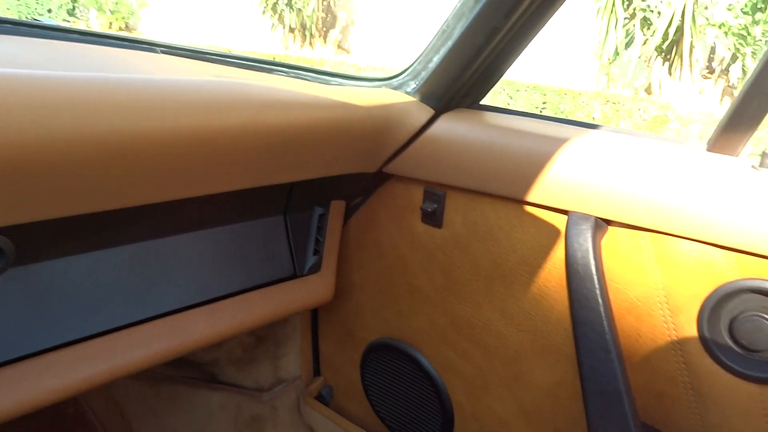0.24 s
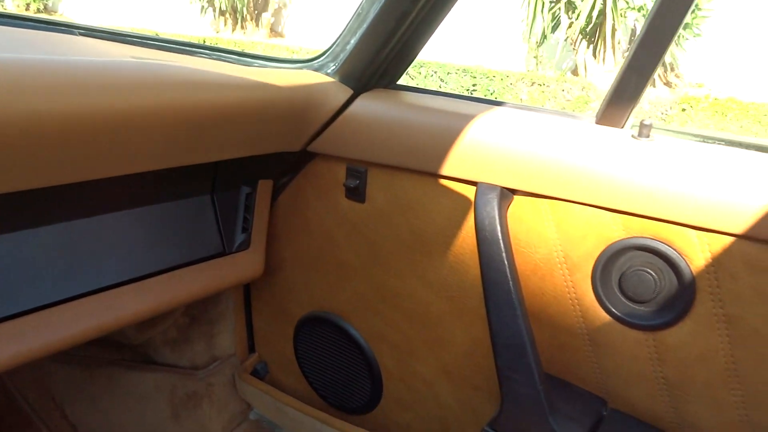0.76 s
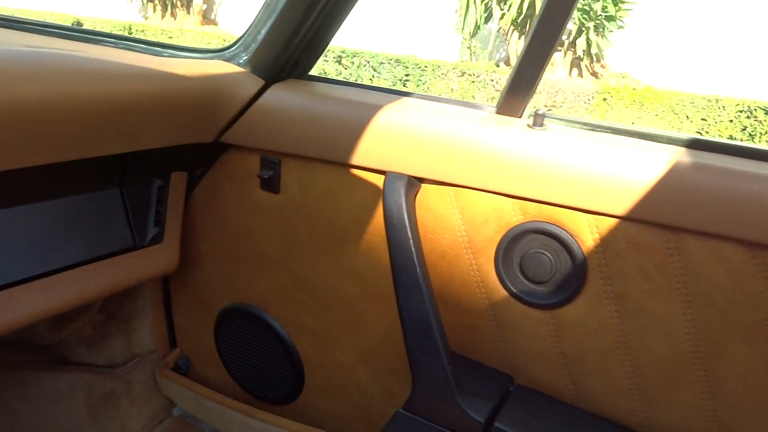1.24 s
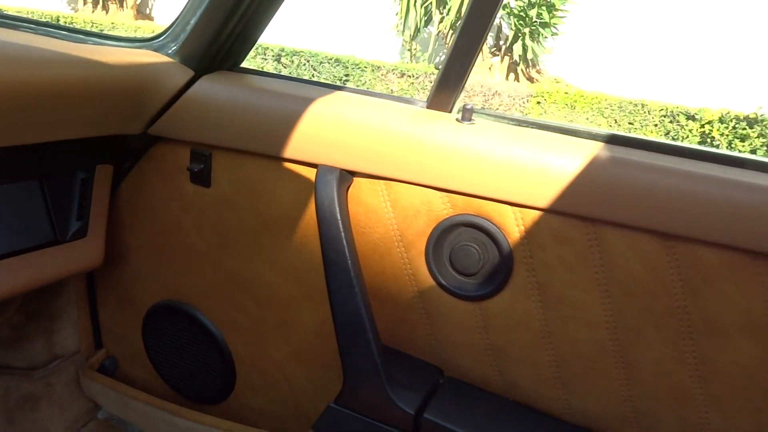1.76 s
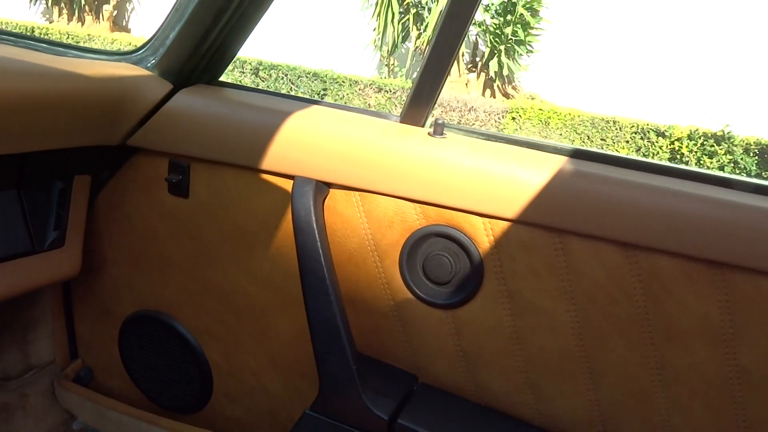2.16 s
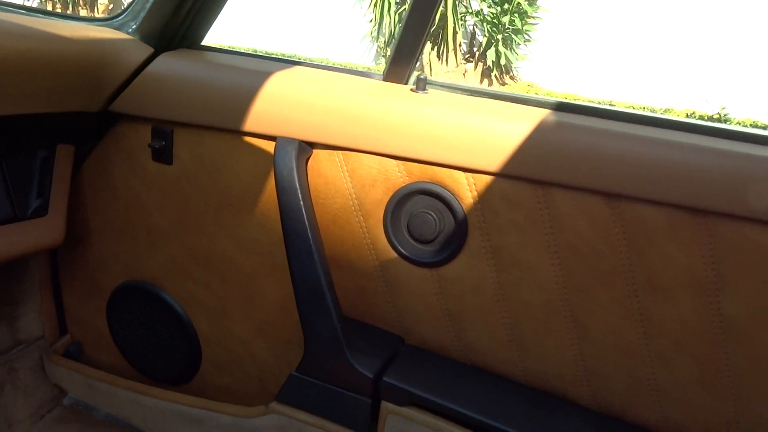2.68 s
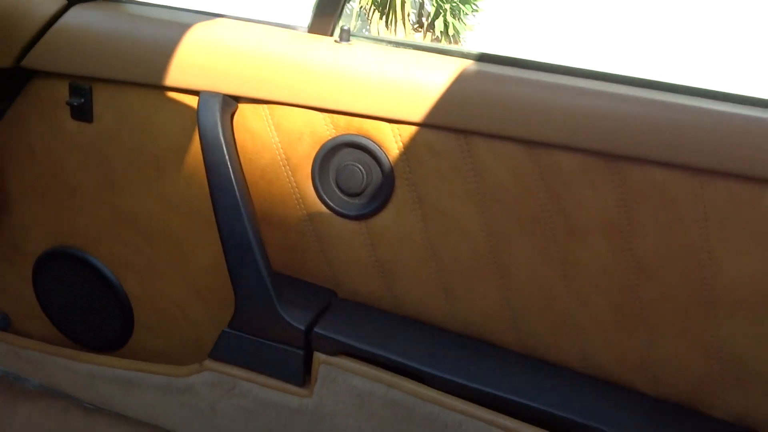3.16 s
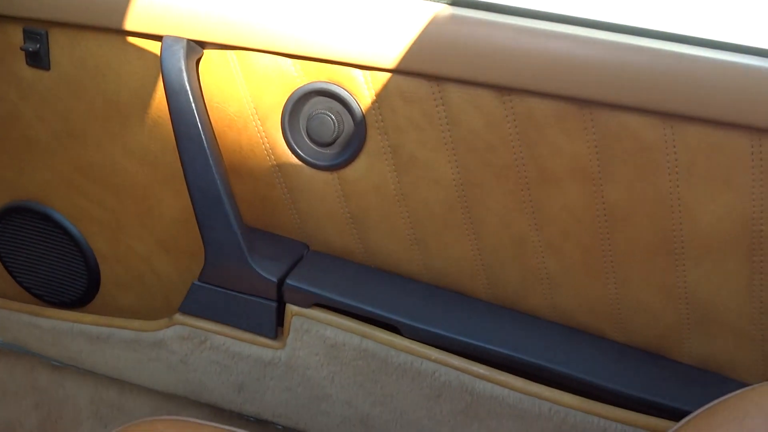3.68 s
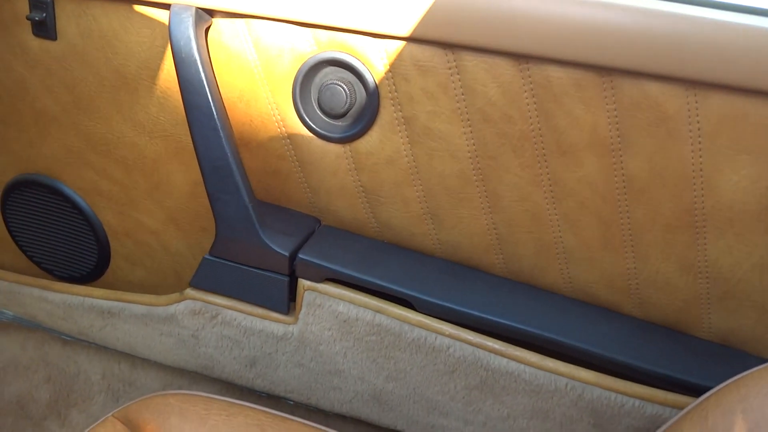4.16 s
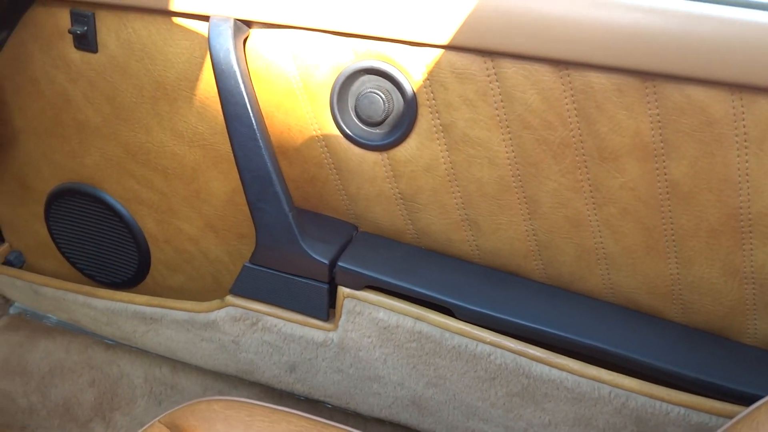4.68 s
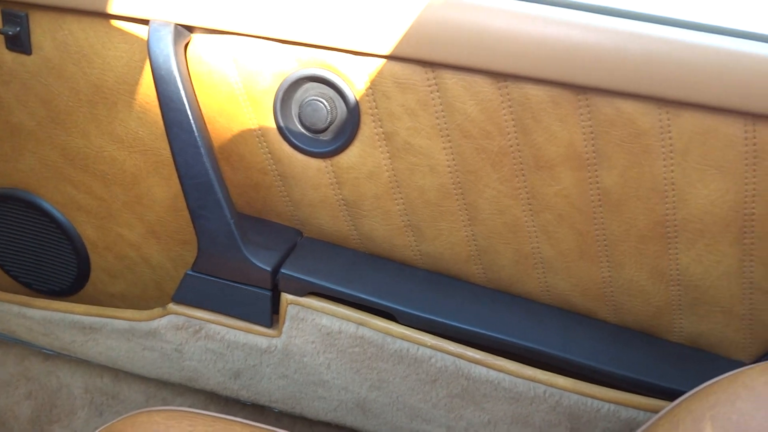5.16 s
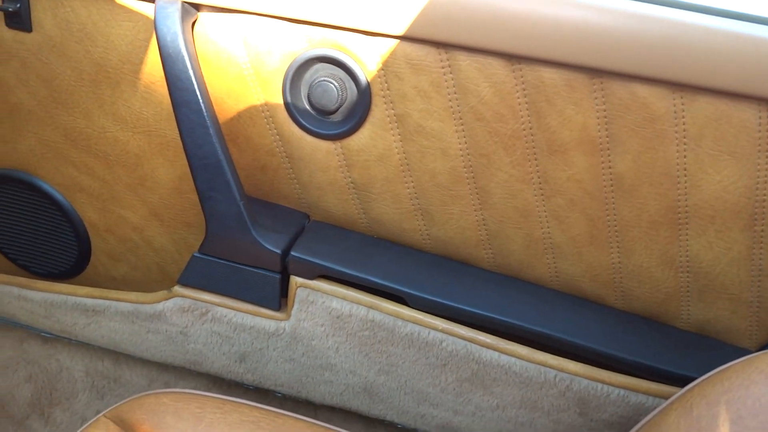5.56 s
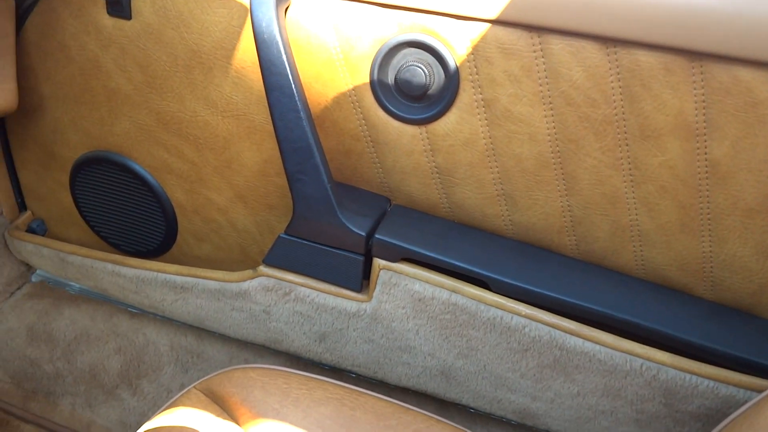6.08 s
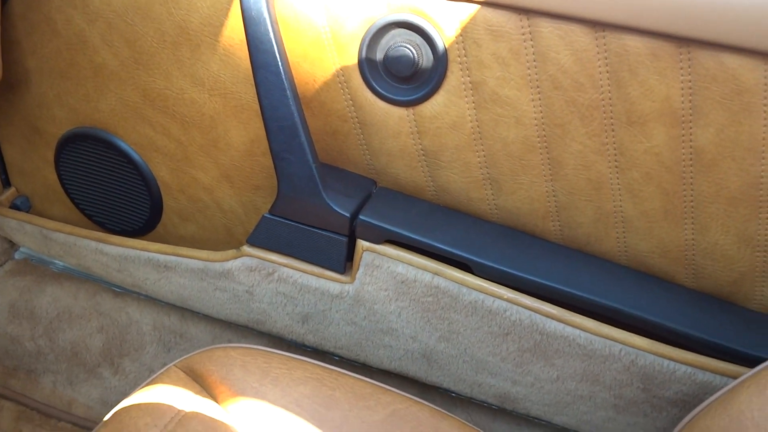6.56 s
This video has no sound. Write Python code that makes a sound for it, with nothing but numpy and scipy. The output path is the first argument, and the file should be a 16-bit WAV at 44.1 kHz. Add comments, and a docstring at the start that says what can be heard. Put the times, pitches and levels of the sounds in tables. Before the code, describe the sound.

A bunch of keys clinks and jingles close by in a quiet parked car, sparse dull clicks growing into bright, dense bursts over faint hum.

```python
"""A bunch of keys is turned over in a hand inside a parked car.
A faint low hum, outdoor air and the hiss of fingers (shaped noise) lie beneath everything from the start.
First come single dull clicks (damped noise clouds with one note), a little seat rustle and a few soft bumps.
Then the jingles grow brighter and denser: plastic heads knock, a heavier key chimes, and keys that
swing free ring on briefly as decaying sines, while the upholstered cabin keeps other contacts short."""
import sys
import numpy as np
from scipy.fft import rfft, irfft, next_fast_len
from scipy.io import wavfile
from scipy.ndimage import map_coordinates

SR = 44100
rng = np.random.default_rng(int(sys.argv[2]) if len(sys.argv) > 2 else 0)


def digitize_waveform(pressure):
    """Quantize a signal to 16-bit integers and store it at the path in sys.argv[1].

    Rows of a 2-D input are taken as channels; values are limited to [-1, 1].
    """
    field = np.atleast_2d(pressure).T
    bounded = np.clip(field, -1, 1)
    quanta = np.round(bounded * 32767).astype(np.int16)
    wavfile.write(sys.argv[1], SR, quanta)


N = 301203

# low hum, level over time: time_s, level_db
HUM_LEVEL = [(0, -57.5), (6.8, -61.5)]
# colour of the hum: freq_hz, density_db (per Hz, relative)
HUM_COLOUR = [(11, -39), (18, 2.5), (49, 3.5), (65, 6), (91, -8), (151, 2.5), (215, -14), (240, -23),
              (310, -60), (530, -120)]
# steady tones in the hum: freq_hz, level_db (against the hum, before wavering)
HUM_TONES = [(33, -14.5), (56, -9), (157, -15)]
# outdoor air, level over time: time_s, level_db (before trim and wavering)
AIR_LEVEL = [(0.0, -51.5), (0.25, -53), (1.45, -51.5), (1.75, -50.5), (2.72, -53.5), (3.06, -50.5),
             (3.33, -55.5), (3.96, -53.5), (4.24, -57.5), (5.73, -55.5), (6.28, -56.5), (6.83, -54.5)]
# colour of the air: freq_hz, density_db (per Hz, relative)
AIR_COLOUR = [(180, -9), (320, -1.5), (430, -1.5), (680, -4.5), (830, 2), (1150, 3), (1600, -3),
              (2100, -7.5), (3000, -13.5), (4500, -16), (8000, -42)]
# hiss of the hand between the slides: time_s, level_db
GRIP_LEVEL = [(0, -54.5), (2.8, -54), (4.2, -59.5), (5.3, -51), (6.45, -63), (6.83, -60)]
# fingers slide over the keys: start_s, length_s, level_db
RUBS = [(0, 0.24, -50.5), (.42, 0.64, -55), (1.208, 0.11, -51), (1.57, 0.2, -48), (1.82, 0.38, -56.5),
        (2.46, 0.51, -59.5), (2.878, 0.2, -49), (3.436, 0.26, -50.5), (3.87, 0.3, -57), (4.266, 0.056, -57),
        (4.452, 0.3, -58.5), (4.925, 0.27, -53), (5.45, 0.11, -51.5), (5.604, 0.26, -52.5),
        (5.918, 0.11, -48), (6.11, 0.2, -54), (6.581, 0.21, -52)]
# colour of skin hiss: freq_hz, density_db (per Hz, relative)
SKIN_COLOUR = [(1500, -12), (3000, -5), (4300, -2), (5400, 0.5), (6200, 3.5), (7000, -3.5), (8000, -12.5),
               (10000, -9), (15000, -62)]
# colour of metal sliding on metal: freq_hz, density_db (per Hz, relative)
METAL_SLIDE_COLOUR = [(6000, -21), (8000, -18.5), (10000, 1), (11300, -5), (12500, -9), (14500, -8.5),
                      (15800, -20)]
# key against key: start_s, click_db (near 5 kHz, relative), knock_db (near 1.7 kHz, over the click),
# sparkle_db (near 11 kHz, over the click), note_hz
CONTACTS = [(0.026, -39, -9, -2, 5720), (0.041, -35.5, -12, -4.5, 5950), (0.199, -45, 1.5, -8.5, 1320),
            (0.993, -48, 7, -17, 3040), (1.053, -40.5, 0, -22, 2310), (1.308, -42, -6.5, -22, 6080),
            (1.412, -43, -7, -7, 6040), (1.474, -28, -7.5, -13, 5820), (1.586, -32, 1.5, -13.5, 2950),
            (1.756, -33.5, -8, -8, 6000), (1.953, -36, -30, -4, 6100), (1.974, -40, 1, -7, 5680),
            (2.069, -45, -16, -5, 6120), (2.11, -37.5, -9, -4, 6470), (2.121, -37.5, -10, -2.5, 6370),
            (2.277, -37, -3, -4.5, 6870), (2.415, -28.5, -15.5, -2, 3590), (2.509, -39, -6, -14, 6300),
            (2.528, -45, 1.5, -1, 5640), (2.55, -29, -23, -9.5, 6960), (2.595, -33, -9.5, 3.5, 10600),
            (2.692, -42.5, -15, -3.5, 5300), (2.775, -44, -19, -8, 6400), (2.881, -52, 9, -4.5, 2590),
            (3.009, -43.5, -3, -4, 3300), (3.123, -46, -2.5, -10, 3450), (3.192, -47, 0.5, -15.5, 2520),
            (3.34, -40, -6, -17.5, 5300), (3.374, -38.5, -5, -4, 6000), (3.385, -28, -5.5, -2.5, 6160),
            (3.447, -38.5, -4.5, -1.5, 5950), (3.587, -40, -1.5, 0, 5590), (3.614, -39, -0.5, 2, 6100),
            (3.637, -30.5, -5.5, 2, 6180), (3.721, -40.5, -4.5, -5, 5630), (3.738, -41.5, -6.5, -4, 5590),
            (3.803, -31.5, -22, 1.5, 10980), (3.869, -31.5, -18, 1.5, 5620), (3.883, -33.5, -7.5, -6, 5870),
            (3.912, -40, -3, -7, 6400), (3.967, -41.5, -11, -17, 6400), (4.055, -37.5, -3.5, -5.5, 1580),
            (4.095, -48, 2, 2, 12240), (4.128, -43, -0.5, -3, 5140), (4.43, -45, -12, 2, 6080),
            (4.492, -49, 0.5, 4, 5900), (4.547, -42.5, -24, 4, 12480), (4.577, -41.5, -37, 7, 12200),
            (4.598, -42, -25, 6, 8160), (4.613, -35, -15, 3.5, 12330), (4.653, -37, -10, -7.5, 5140),
            (4.681, -38, -12, -2, 5720), (4.921, -44, -6, 7, 6080), (4.94, -38.5, -13, 8.5, 13900),
            (4.98, -41, -16, 6, 5460), (5.001, -34, -13.5, 3, 9700), (5.022, -43, -4, 4, 6130),
            (5.053, -32, -10, -2.5, 6130), (5.171, -40.5, -19, -5, 6200), (5.349, -33.5, -6.5, -6.5, 6180),
            (5.421, -42, -12, 0, 6090), (5.464, -34.5, -12.5, -2, 5630), (5.492, -33.5, 0, -12, 5700),
            (5.508, -37.5, -1.5, -4, 5730), (5.528, -39, -4, 7, 6100), (5.544, -36.5, -8, -11, 3540),
            (5.605, -33.5, -13.5, -1.5, 14100), (5.621, -34, -11, -0.5, 14120),
            (5.649, -26, -20, 1.5, 6000), (5.705, -34, -11, 7, 14050), (5.844, -45, -10.5, -1.5, 5470),
            (6.06, -43, -6.5, 3.5, 11800), (6.086, -36, -20, 6, 13870), (6.127, -45.5, -10, 6.5, 14170),
            (6.178, -26.5, -10, 2, 8580), (6.196, -25, -12.5, 1, 8170), (6.261, -46, -2.5, 9.5, 14280),
            (6.321, -32, -15, 4.5, 6180), (6.469, -23.5, -6.5, -7.5, 6140), (6.551, -41, -15, 1, 5930),
            (6.62, -40, -7, 0, 6070), (6.641, -29.5, -18, 0, 5540), (6.673, -27.5, -17.5, -2.5, 5650),
            (6.716, -39, -16, 1, 6030), (6.824, -36.5, -12, 6.5, 9940)]
# colour of a contact: freq_hz, density_db (per Hz, relative)
CLINK_COLOUR = [(450, -25), (850, -18), (1350, -4.5), (2100, -3.5), (3400, 1.5), (4500, -2), (5900, 9),
                (7500, 2.5), (8500, 4), (10000, 17), (11200, 7.5), (12400, 13.5), (14200, 8), (15600, -4)]
# the bunch shifts and small touches tumble: start_s, length_s, click_db (before scatter),
# sparkle_db (over the click)
FLURRIES = [(.03, .03, -45.5, -3), (3.595, .05, -35, -10), (3.74, .04, -42.5, 0), (3.89, .09, -55, 2),
            (4.06, .08, -49, -2), (4.438, .04, -45.5, 0), (4.56, .09, -42.5, 2), (4.93, .13, -39, -2),
            (5.43, .12, -51.5, -3), (5.61, .11, -43.5, 3), (6.07, .11, -53, 0), (6.324, .04, -46, -12),
            (6.55, .13, -47, -6)]
# range of the notes of small touches: low_hz, high_hz
TOUCH_NOTE_HZ = (5550, 6500)
# clothes shift on the seat: centre_s, half_length_s, level_db (before grain), centre_hz
RUSTLES = [(0.637, 0.19, -55, 292), (.64, 0.12, -65, 116), (1.207, 0.2, -61, 440), (1.795, 0.27, -56, 805),
           (3.02, .11, -51.5, 560), (3.006, 0.12, -51.5, 2420), (5.043, 0.076, -56.5, 360),
           (5.366, 0.018, -51.5, 323), (5.498, 0.13, -56.5, 585)]
# soft bumps on the trim: start_s, level_db, pitch_hz, t60_s
BUMPS = [(0.558, -44, 318, .12), (0.577, -48, 157, 0.17), (0.668, -45, 306, 0.076),
         (0.676, -43.5, 180, 0.08), (2.28, -51.5, 167, 0.13), (4.941, -48, 114, 0.09),
         (5.351, -46, 302, 0.16), (5.354, -46, 545, .07), (5.375, -48, 140.5, 0.27)]
# a key's plastic head knocks: start_s, level_db
HEAD_KNOCKS = [(1.586, -39), (4.054, -42), (6.4662, -30.5)]
# what the head rings with: pitch_hz, level_db (relative), t60_s
HEAD_MODES = [(1366, -7, 0.028), (1564, -2, 0.049), (1867, -3, 0.053)]
# strikes of a heavier key on the ring: start_s, level_db
HEAVY_STRIKES = [(3.738, -40), (3.804, -32), (3.866, -28.5), (5.649, -32), (6.64, -23), (6.676, -28)]
# what the heavier key rings with: pitch_hz, level_db (relative), t60_s
HEAVY_MODES = [(5630, -1, .08), (5820, 0, .07), (5930, -3, .07), (12470, -9, .05)]
# a key swings free and rings: start_s, fifth_mode_db, last_mode_db (ends of a tilt over KEY_MODES)
FREE_RINGS = [(3.8063, -50, -54), (3.8678, -50, -37), (4.5767, -35, -38), (4.9452, -35, -25),
              (5.0415, -29.5, -36), (5.6224, -36, -37), (5.688, -36, -29), (5.7028, -48, -23),
              (5.711, -56, -28), (6.099, -53, -32), (6.1554, -49, -33), (6.1758, -46, -29),
              (6.212, -35, -34), (6.3231, -29.5, -31), (6.3388, -34, -29), (6.3564, -41, -37),
              (6.4736, -41, -29), (6.6732, -38, -30)]
# what free keys ring with: pitch_hz (before bending), level_db (relative, before scatter), t60_s
KEY_MODES = [(2929, -16, .07), (3386, -14, .07), (5566, -10, .07), (5985, -7, .08), (6135, 1, .16),
             (6250, -7, .13), (6944, -14, .07), (8038, -7, .09), (8190, -5, .11), (8530, -10, .07),
             (9670, -12, .08), (9850, -8, .1), (10400, -12, .07), (11880, -4, .11), (12010, -9, .08),
             (12430, -9, .07), (13830, -5, .08), (14045, 1, .085), (14170, -6, .08), (14330, -8, .08)]
# side level set for the background, against the middle: freq_hz, side_over_mid_db
BACKGROUND_SIDE = [(30, -48), (100, -26.5), (250, -12), (700, -11.5), (1300, -12), (2500, -17),
                   (4000, -27.5), (6000, -31), (8500, -4), (12500, -32)]
# keys heard off glass and trim: freq_hz, side_db (against the direct sound)
REFLECTED = [(1000, -30), (3500, -53), (6000, -19), (8500, -7), (12000, -24)]
# level difference between the ports: freq_hz, left_minus_right_db
PORT_LEAN = [(200, 0), (800, -.6), (2200, 0), (5000, 0), (6300, -.7), (7000, -3.5), (8000, -4.3),
             (8250, -7.5), (8680, -12), (9000, -5.5), (9500, -2.3), (10700, -.7), (12000, 0)]
# phase difference between the ports: freq_hz, left_lead_rad
PORT_LEAD = [(4800, 0), (6100, -.26), (8100, -.43), (8750, -.2), (8950, .22), (9800, .26), (11300, 0)]

RUB_ATTACK_S, RUB_RELEASE_S = 0.025, 0.026
METAL_SLIDE_DB = -9.5  # against the hiss of skin
CLINK_ATTACK_S = 0.0018
REBOUND_S, REBOUND_DB = 0.007, -13  # mean delay and level of a second, weaker blow
TOUCHES_PER_S, TOUCH_SCATTER_DB = 90, 2.5
TOP_HZ = 15850


def amp(db):
    """Decibels to gain."""
    return 10 ** (np.asarray(db) / 20)


def unit(x):
    """Bring x to rms 1."""
    return x / np.sqrt(np.mean(x ** 2) + 1e-20)


def along(points, hz):
    """Read (Hz, value) points on a log frequency axis."""
    f, v = np.transpose(points)
    return np.interp(np.log(hz + 1), np.log(f + 1), v)


def level_curve(points):
    """Draw (s, dB) points out to one value per sample."""
    s, db = np.transpose(points)
    return np.interp(np.arange(N) / SR, s, db)


def wobble(rate):
    """A random curve: straight lines between rate knots a second."""
    knots = rng.standard_normal(int(N * rate / SR) + 4)
    return map_coordinates(knots, [np.arange(N) * rate / SR], order=1)


def filtered(x, response):
    """Shape the spectrum of x by a function of frequency."""
    m = next_fast_len(N + SR // 4)
    return irfft(rfft(x, m) * response(np.fft.rfftfreq(m, 1 / SR)), m)[..., :N]


def noise(spectrum):
    """Noise of rms 1 with the given colour, falling away beyond its end points."""
    def response(hz):
        upper_end = 1 / (1 + (hz / spectrum[-1][0]) ** 8)
        lower_end = 1 / (1 + (spectrum[0][0] / (hz + 1)) ** 8)
        return amp(along(spectrum, hz)) * upper_end * lower_end
    return unit(filtered(rng.standard_normal(N), response))


def add(track, s, sound):
    """Mix a sound into the track at s seconds."""
    start = max(round(s * SR), 0)
    track[start:start + len(sound)] += sound[:max(N - start, 0)]


def fade(t, attack, t60):
    """A quick rise and an exponential decay, peak 1."""
    shape = (1 - np.exp(-t / attack)) * amp(-60 * t / t60)
    return shape / shape.max()


def struck(t, modes, attack):
    """A struck body: decaying sines that start at random phases."""
    tones = 0
    for hz, db, t60 in modes:
        tones = tones + amp(db) * fade(t, attack, t60) * np.sin(2 * np.pi * (hz * t + rng.random()))
    return tones


def cabin(air_trim_db=0.33):
    """Coloured noise with wavering low tones makes the hum; unsteady noise makes the air outside."""
    t = np.arange(N) / SR
    tones = 0
    for hz, db in HUM_TONES:
        level = amp(db + 2.1 * wobble(3.37)) * np.sqrt(2)  # a sine of peak sqrt(2) has rms 1
        tones = tones + level * np.sin(2 * np.pi * hz * t + wobble(8.9))
    hum = amp(level_curve(HUM_LEVEL)) * (noise(HUM_COLOUR) + tones)
    air_level = amp(level_curve(AIR_LEVEL) + air_trim_db + 1.88 * wobble(90))
    return hum + air_level * noise(AIR_COLOUR)


def rubbing():
    """Gain of the rubbing: each slide rises, holds and lets go, over the grip."""
    t = np.arange(N) / SR
    power = amp(level_curve(GRIP_LEVEL)) ** 2
    for s, length, db in RUBS:
        before = np.maximum(s - t, 0) / RUB_ATTACK_S
        after = np.maximum(t - s - length, 0) / RUB_RELEASE_S
        power = power + (amp(db) * np.exp(-(before + after) ** 2)) ** 2
    return np.sqrt(power)


def fingers(grain_db=1.5):
    """A soft hiss, grainy where keys slide over skin and over each other."""
    grain = unit(amp(grain_db * wobble(160) + 0.43 * wobble(35)))
    hiss = noise(SKIN_COLOUR) + amp(METAL_SLIDE_DB) * noise(METAL_SLIDE_COLOUR)
    return grain * rubbing() * hiss


def clink(t, levels, note_hz, life, body_db):
    """One contact: a snap, a cloud of damped modes that depends on where the keys meet, and one clear note."""
    hz = np.fft.rfftfreq(len(t), 1 / SR)
    # a random level every 190 Hz stands for the meeting point
    modes_db = 5.0 * map_coordinates(rng.standard_normal(120), [hz / 190], order=1)
    below = lambda edge_hz: 1 / (1 + (hz / edge_hz) ** 20)
    colour = amp(along(CLINK_COLOUR, hz) + modes_db + body_db * below(1580))
    low, not_high = below(3470), below(7540)
    bands = [low, not_high - low, 1 - not_high]  # knock, click, sparkle
    gain = sum(amp(db) * unit(colour * band) for db, band in zip(levels, bands))
    # the key touches, then lands hard up to a few milliseconds later
    landing = np.maximum(t - rng.uniform(0.0009, 0.0037), 0)
    hardness = amp(1.13 * rng.standard_normal())
    snap = hardness * fade(landing, 0.0001, 0.0011)
    decay = fade(t, CLINK_ATTACK_S, life)
    chatter = amp(-0.1 * np.interp(t, np.arange(99) / 700, rng.standard_normal(99)))
    cloud = irfft(rfft(rng.standard_normal(len(t))) * gain, len(t)) * np.hypot(decay, snap) * chatter
    # the note takes its level from the bands around it
    note_db = along(list(zip([1700, 5000, 11000], levels)), note_hz) - 0.5
    note = np.sin(2 * np.pi * (note_hz * t + rng.random())) * decay
    return cloud + amp(note_db) * note


def contacts(held_t60=0.046, free_t60=0.055, held_body_db=9):
    """Keys pinched by the fingers have more body and stop sooner; loose ones are bright and last longer."""
    t = np.arange(4096) / SR
    track = np.zeros(N)
    for s, db, knock, sparkle, note_hz in CONTACTS:
        loose = np.clip(1 + sparkle / 14, 0, 1)  # brighter means looser
        life = held_t60 + loose * (free_t60 - held_t60)
        levels = (db + knock, db, db + sparkle)
        body_db = held_body_db * (1 - loose) ** 4
        add(track, s, clink(t, levels, note_hz, life, body_db))
        # the struck key bounces back once
        rebound_s = s + REBOUND_S * (0.5 + rng.random())
        add(track, rebound_s, amp(REBOUND_DB) * clink(t, levels, note_hz, life, body_db))
    return track


def shimmer(lead_s=0.0054, lag_s=0.011, click_db=-13, sparkle_db=-13):
    """Neighbouring keys drag over each other around each contact: grainy noise in short swells."""
    t = np.arange(-SR // 20, SR // 8) / SR
    drag = np.exp(-(t / np.where(t < 0, lead_s, lag_s)) ** 2)
    click_power, sparkle_power = np.zeros((2, N))
    for s, db, _, sparkle, _ in CONTACTS:
        add(click_power, s + t[0], amp(db + min(sparkle, 0) + click_db) ** 2 * drag)
        add(sparkle_power, s + t[0], amp(db + sparkle + sparkle_db) ** 2 * drag)
    metal = noise(CLINK_COLOUR)
    middle = unit(filtered(metal, lambda hz: (hz > 2400) & (hz < 7900)))
    top = unit(filtered(metal, lambda hz: hz > 7900))
    grain = unit(amp(3 * wobble(360)))
    return (np.sqrt(click_power) * middle + np.sqrt(sparkle_power) * top) * grain


def flurries(knock_db=-15, life=0.06):
    """While the bunch shifts, loose keys touch at uneven intervals."""
    t = np.arange(2048) / SR
    track = np.zeros(N)
    for start, length, db, sparkle in FLURRIES:
        for k, (slip, size, pitch) in enumerate(rng.random((20, 3))):
            delay = (k + slip) / TOUCHES_PER_S
            click = db + TOUCH_SCATTER_DB * (2 * size - 1)
            levels = (click + knock_db, click, click + sparkle)
            note_hz = np.interp(pitch, [0, 1], TOUCH_NOTE_HZ)
            touch = clink(t, levels, note_hz, life, body_db=0)
            add(track, start + delay, touch * (delay < length))  # silent once the flurry is over
    return track


def ticks(count=90, spread_db=2, knock_db=-6, sparkle_db=-7, life=0.05):
    """Tiny stray touches at random times follow the rubbing level; a few stand out."""
    t = np.arange(2048) / SR
    rub_db = 20 * np.log10(rubbing())
    track = np.zeros(N)
    for when, size, pitch in rng.random((count, 3)):
        db = rub_db[int(when * N)] - spread_db * np.log(size + 0.0085)
        note_hz = np.interp(pitch, [0, 1], TOUCH_NOTE_HZ)
        levels = (db + knock_db, db, db + sparkle_db)
        add(track, when * N / SR, clink(t, levels, note_hz, life, body_db=5))
    return track


def seat(skirt_db=-17):
    """Cloth rubs on leather: bands of noise in short, uneven swells."""
    t = np.arange(N) / SR
    swells = 0
    for s, half, db, hz in RUSTLES:
        cloth = noise([(hz / 3, skirt_db), (hz, 0), (hz * 3.5, skirt_db)])
        swells = swells + amp(db) * np.exp(-((t - s) / half) ** 2) * cloth
    return swells * amp(2.5 * wobble(60))


def bumps(attack=0.0021):
    """Padded trim answers a nudge with one short low note, a decaying sine."""
    t = np.arange(SR // 3) / SR
    track = np.zeros(N)
    for s, db, hz, t60 in BUMPS:
        add(track, s, amp(db) * fade(t, attack, t60) * np.sin(2 * np.pi * hz * t))
    return track


def key_head():
    """The plastic head of a key gives a short hollow clack from a few fast-dying modes."""
    t = np.arange(SR // 10) / SR
    track = np.zeros(N)
    for s, db in HEAD_KNOCKS:
        add(track, s, amp(db) * struck(t, HEAD_MODES, attack=0.00089))
    return track


def heavy_key():
    """The heavy key's close modes beat against each other as they fade."""
    t = np.arange(SR // 6) / SR
    track = np.zeros(N)
    for s, db in HEAVY_STRIKES:
        add(track, s, amp(db) * struck(t, HEAVY_MODES, attack=0.0003))
    return track


def rings(scatter_db=3, attack=0.00097):
    """A free key rings in its modes; where it is struck sets their strengths, and the grip bends them slightly."""
    t = np.arange(SR // 4) / SR
    hz, db, t60 = np.transpose(KEY_MODES)
    decays = np.array([fade(t, attack, life) for life in t60])
    total = np.sqrt(np.mean(amp(db) ** 2))
    track = np.zeros(N)
    for s, fifth_db, last_db in FREE_RINGS:
        strength, grip, phase = rng.standard_normal((3, len(hz)))
        tilt = amp(along([(hz[4], fifth_db), (hz[-1], last_db)], hz))
        # the weak modes belong to neighbouring keys and shift most from clink to clink
        bend = 1 + grip * (0.0015 - 0.0006 * np.minimum(db, 0))
        tones = np.sin(2 * np.pi * ((hz * bend)[:, None] * t + phase[:, None]))
        shares = unit(amp(db + scatter_db * strength)) * total
        add(track, s, (tilt * shares) @ (tones * decays))
    return track


def ports(x):
    """Two close microphone ports hear a near sound with small differences of level and phase."""
    half = np.array([[0.5], [-0.5]])  # left and right take half the difference each

    def difference(hz):
        return amp(half * along(PORT_LEAN, hz)) * np.exp(1j * half * along(PORT_LEAD, hz))
    return filtered(x, difference)


def scene():
    """Keys close by in the middle; their reflections and part of the background go to the side signal."""
    keys = lambda: contacts() + rings()
    background = lambda: cabin() + fingers() + shimmer()
    near = keys() + flurries() + ticks() + seat() + bumps() + key_head() + heavy_key()
    # fresh random draws for the side signal
    background_side = filtered(background(), lambda hz: amp(along(BACKGROUND_SIDE, hz)))
    reflections = filtered(keys(), lambda hz: amp(along(REFLECTED, hz)))
    side = background_side + reflections
    return ports(near + background()) + np.array([side, -side])


def record(dry):
    """A sharp band limit removes everything from TOP_HZ up."""
    return filtered(dry, lambda hz: hz < TOP_HZ)


dry = scene()
out = record(dry)
digitize_waveform(out)
```